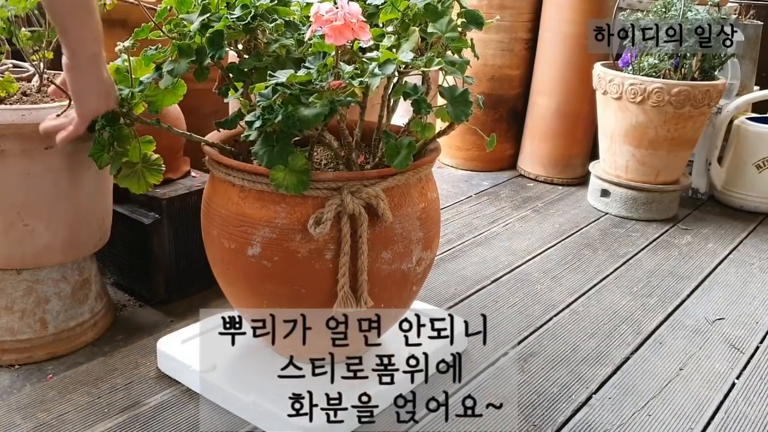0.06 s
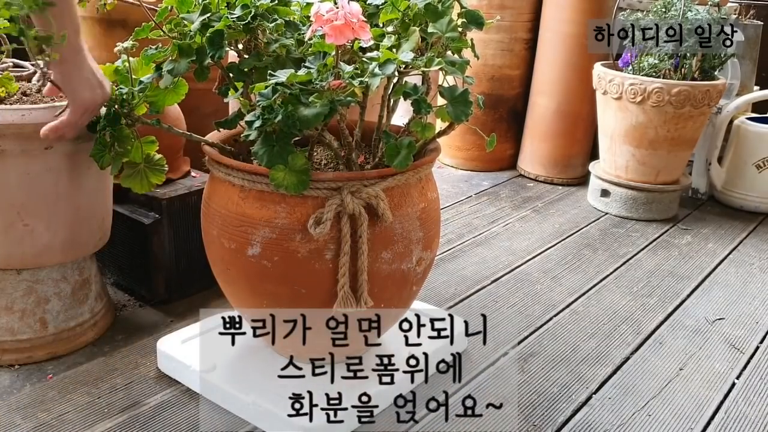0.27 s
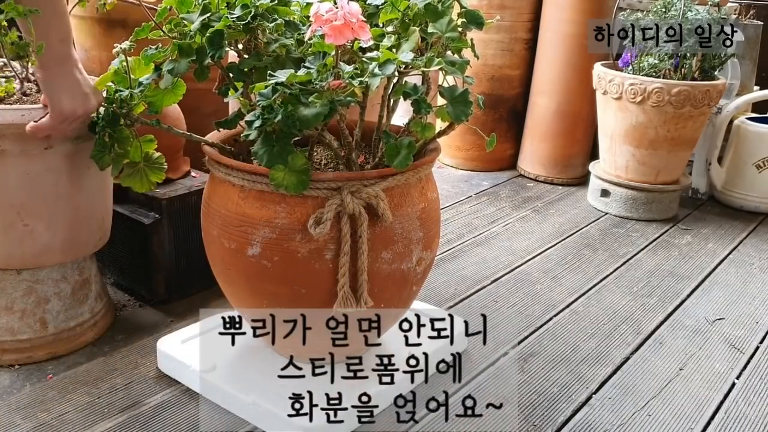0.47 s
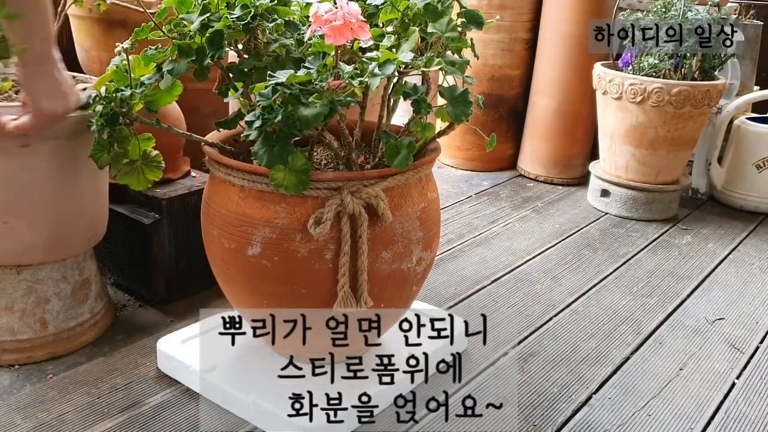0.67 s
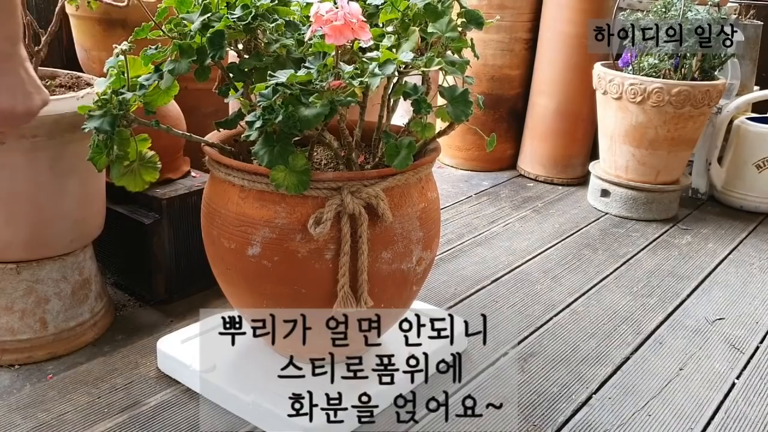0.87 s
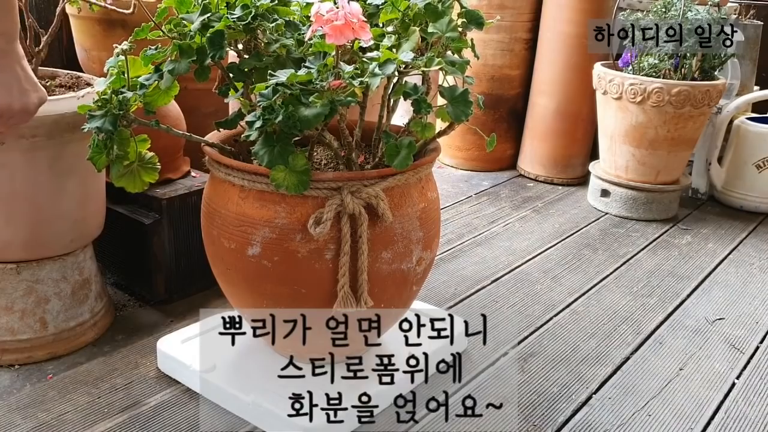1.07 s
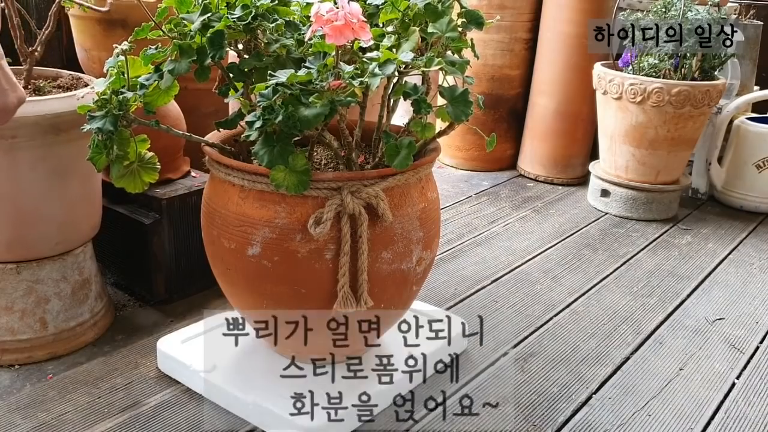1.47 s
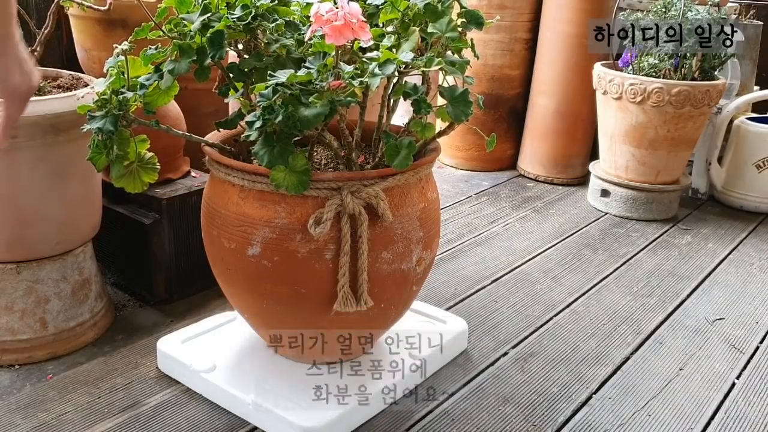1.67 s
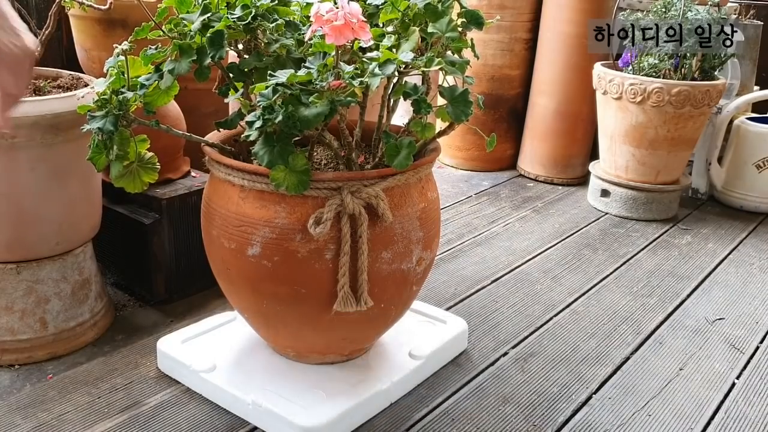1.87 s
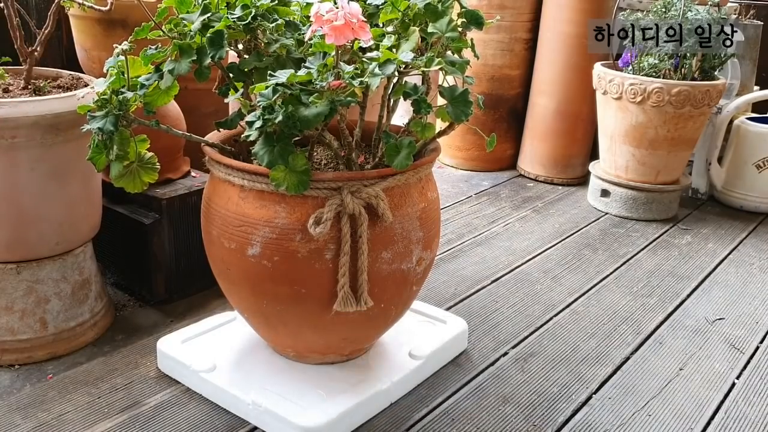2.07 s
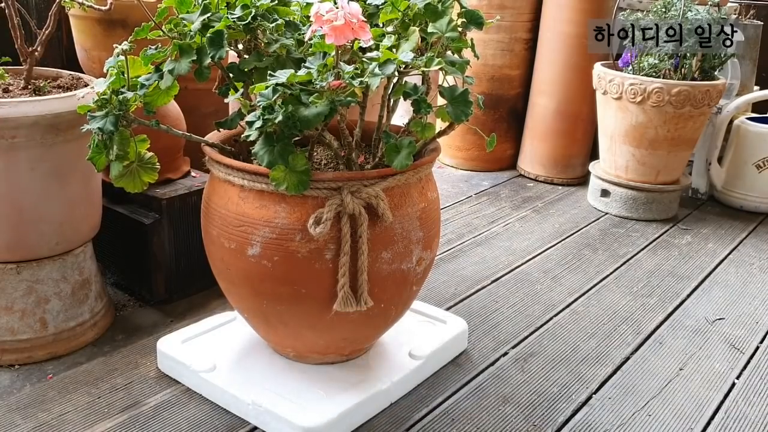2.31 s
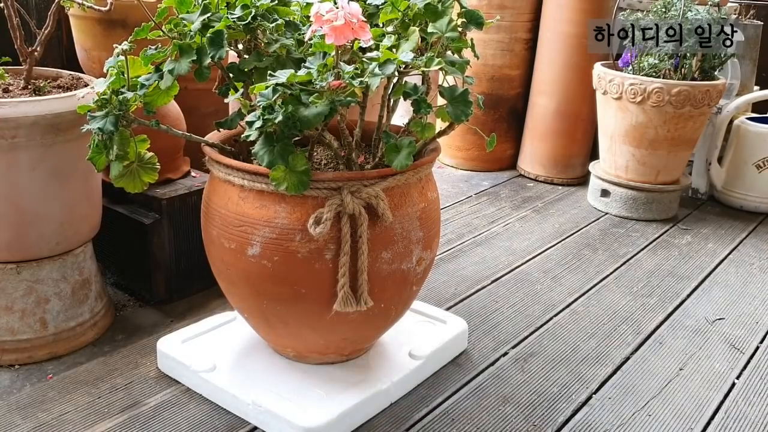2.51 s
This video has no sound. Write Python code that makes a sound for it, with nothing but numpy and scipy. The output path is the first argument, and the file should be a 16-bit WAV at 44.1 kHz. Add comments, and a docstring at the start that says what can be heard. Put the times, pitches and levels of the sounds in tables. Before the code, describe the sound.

A heavy clay pot scrapes twice across wooden boards, then rocks and settles with hollow knocks.

```python
"""A wooden deck outdoors, a stereo pair of microphones on a heavy clay pot.
The pot is pushed twice across the boards, then rocks and settles on its foot. Grit hisses under the
sliding foot and makes the clay ring, while stick and slip shakes the boards. Each knock is a hollow
thud of the deck with a gritty clack of clay. Far off lie a low rumble and one chirp of a bird."""
import sys
import numpy as np
from scipy import signal
from scipy.fft import rfft, irfft
from scipy.io import wavfile
from scipy.ndimage import uniform_filter1d

SR = 44100
rng = np.random.default_rng(int(sys.argv[2]) if len(sys.argv) > 2 else 0)


def digitize_waveform(pressure):
    """Quantize a signal to 16-bit integers and store it at the path in sys.argv[1].

    Rows of a 2-D input are taken as channels; values are limited to [-1, 1].
    """
    field = np.atleast_2d(pressure).T
    bounded = np.clip(field, -1, 1)
    quanta = np.round(bounded * 32767).astype(np.int16)
    wavfile.write(sys.argv[1], SR, quanta)


N = 116865
TIME = np.arange(N) / SR
RIGHT_LAG_S = 0.00022

# knocks of the foot: t/s, thud level/dB, clack level/dB, contact brightness/Hz
KNOCKS = [(0.430, -58, -55.5, 4500), (0.434, -43, -51, 3730), (0.45, -46, -55, 3360),
          (0.711, -48.5, -61, 6000), (0.796, -43.5, -53, 2570), (0.824, -49, -58.5, 2200),
          (0.959, -53, -60, 1760), (1.903, -39.5, -41.5, 3150), (1.9154, -47, -55, 3200),
          (1.939, -46.5, -82, 1600), (1.951, -35.5, -53, 2900), (1.968, -38.5, -61, 1720),
          (1.979, -46.5, -67, 1700), (2.001, -49, -70, 1000), (2.011, -39, -61.5, 1500),
          (2.024, -44.5, -76, 1000), (2.036, -43.5, -79, 1000), (2.1375, -50, -54.5, 4450),
          (2.142, -34, -45, 2940), (2.152, -39.5, -53, 2440), (2.183, -43.5, -68, 1780),
          (2.196, -46, -74, 1500), (2.3826, -35, -56, 910), (2.406, -40, -63, 1020),
          (2.426, -46.5, -76, 1010), (2.554, -56.5, -85, 1000)]
# modes of the pot: f/Hz, width/Hz, level struck/dB, level rubbed/dB
POT_MODES = [(965, 135, 9.5, -10), (1174, 18, 7, 1.5), (1291, 64, 17.5, -4), (1498, 43, 10.5, -8),
             (1650, 110, 9.5, -10.5), (1760, 51, 14, 3.5), (1910, 72, 9.5, -39), (2086, 21, 6, -1),
             (2450, 92, 5, -18), (2747, 29, 5, -2.5), (2750, 66, -3, -42), (3534, 40, -37, -0.5),
             (3960, 15, -29, -2), (4530, 58, -22, -4), (5610, 61, -12, -12)]
# spectrum of the grit's hiss, with the microphones' dip near 8 kHz: f/Hz, level/dB
GRIT_AT_MICS = [(300, 2), (800, 12), (1300, -6.5), (2300, 2.5), (3700, 1.5), (5800, -0.5), (6900, -9),
                (8400, -11.5), (9800, 0), (12000, 2), (15500, -6.5)]


def from_db(db):
    """Decibels to gain."""
    return 10 ** (np.asarray(db) / 20)


def rms_one(x):
    """Scale to unit power."""
    return x / np.sqrt(np.mean(x ** 2) + 1e-20)


def cut(x, hz, kind, order=2):
    """Low- or high-pass."""
    return signal.sosfilt(signal.butter(order, hz, kind, fs=SR, output="sos"), x + 1e-18)


def level(rows, column):
    """Gain over time from a dB curve, silent outside it."""
    rows = np.array(rows)
    return from_db(np.interp(TIME, rows[:, 0], rows[:, column], left=-140, right=-140))


def per_bin(points):
    """A table over log frequency, read at every FFT bin."""
    hz, value = np.transpose(points)
    return np.interp(np.log(np.arange(N // 2 + 1) * SR / N + 1), np.log(hz), value)


def colour(x, spectrum):
    """Give a steady sound its spectrum; rms 1."""
    return rms_one(irfft(rfft(x) * from_db(per_bin(spectrum)), N))


def spread(pair):
    """Two unrelated signals become scattered sound, alike at both microphones in the bass only."""
    # likeness of left and right: f/Hz, coherence
    likeness = [(60, .97), (130, 0.95), (290, 0.63), (640, 0.32), (1400, 0), (15000, 0)]
    alike = per_bin(likeness)
    a, b = rfft(pair)
    mid, side = a * np.sqrt(1 + alike), b * np.sqrt(1 - alike)
    return rms_one(irfft(np.array([mid + side, mid - side]), N))


def place(x):
    """Direct sound reaches the right microphone a little later."""
    hz = np.arange(N // 2 + 1) * SR / N
    return np.array([x, irfft(rfft(x) * np.exp(-2j * np.pi * hz * RIGHT_LAG_S), N)])


def resonate(x, hz, width):
    """A resonance with gain 1 at its peak."""
    r = np.exp(-np.pi * abs(width) / SR)
    feedback = [1, -2 * r * np.cos(2 * np.pi * hz / SR), r * r]
    return signal.lfilter(np.array([1, 0, -1]) * (1 - r * r) / 2, feedback, x + 1e-18)


def dying(start, t60):
    """Sudden onset, exponential decay."""
    age = TIME - start
    return (age >= 0) * np.exp(-np.log(1000) * np.clip(age / t60, 0, 10))


def swell(peak_s, half_s):
    """A bell-shaped rise and fall."""
    return np.exp(-((TIME - peak_s) / half_s) ** 2)


def grains(per_s, spread_db):
    """Random clicks of uneven size; rms 1."""
    sizes = from_db(spread_db * np.minimum(rng.exponential(1, N), 4)) * rng.choice([-1, 1], N)
    return rms_one(sizes * (rng.random(N) < per_s / SR))


def scrape():
    """Grit hisses and catches under the sliding foot and keeps the pot ringing."""
    # sliding speed as the level of the grit, one curve a push: t/s, level/dB
    slides = [
        [(0.53, -85), (0.542, -89), (0.554, -66.5), (0.588, -69.5), (0.71, -53.5), (0.762, -56), (0.82, -55.5),
         (0.902, -64), (0.99, -91)],
        [(1.17, -87), (1.182, -101), (1.194, -70), (1.224, -71.5), (1.374, -53.5), (1.448, -59.5), (1.52, -90)],
    ]
    speed = sum(level(slide, 1) for slide in slides)
    catches = from_db(rms_one(cut(rng.standard_normal(N), 97, "low")))
    grit = catches * spread(np.array([grains(per_s=14000, spread_db=2.5) for side in range(2)]))
    clay = rms_one(sum(from_db(db) * resonate(grit, hz, width) for hz, width, _, db in POT_MODES))
    drive = speed.max() * (speed / speed.max()) ** 0.82   # the ring varies less than the hiss
    return from_db(2.5) * speed * colour(grit, GRIT_AT_MICS) + from_db(-3) * drive * clay


def judder(modes):
    """Uneven slips of the foot drive the boards, at a level evened out over 27 ms."""
    slips = grains(per_s=420, spread_db=2.0)
    boards = sum((-1) ** k * from_db(db) * resonate(slips, hz, width)
                 for k, (hz, width, db) in enumerate(modes))
    boards = cut(boards, 815, "low", order=3)
    boards = cut(boards, modes[0][0] * 0.71, "high", order=4)
    power = np.abs(uniform_filter1d(boards ** 2, int(0.027 * SR) + 1))
    return boards / np.sqrt(power + 1e-3 * np.mean(boards ** 2))


def shaking_boards():
    """The deck groans and booms under each push."""
    # shaking of the boards, one curve a push: t/s, groan level/dB, boom level/dB
    shakes = [
        [(0.48, -62, -62), (0.536, -55, -52), (0.556, -66, -57), (0.578, -56, -64), (0.602, -61.5, -69),
         (0.632, -45.5, -55), (0.674, -49, -59), (0.706, -39.5, -51), (0.764, -44.5, -61), (0.8, -49, -51),
         (0.826, -45, -48), (0.884, -53, -63), (0.93, -68, -68), (0.968, -53.5, -58), (1.024, -69, -61.5),
         (1.05, -62, -78)],
        [(1.15, -74, -84), (1.168, -75, -60), (1.19, -59, -63), (1.212, -64.5, -62), (1.266, -51, -48.5),
         (1.302, -48.5, -58), (1.336, -41.5, -53), (1.37, -42.5, -41), (1.392, -46, -35.5),
         (1.412, -41.5, -39.5), (1.454, -47, -38), (1.52, -71, -57), (1.53, -83, -59), (1.58, -73, -67.5)],
    ]
    # middle and deep resonances of the loaded boards, one set a push: f/Hz, width/Hz, level/dB
    groans = [
        [(276.3, 28, 1), (325.6, 42.5, -1), (379, 32.5, -4), (417, 34, -3), (470, 56, -9.5), (670, 54, -22)],
        [(244, 24, -4), (309, 37, 0), (421.4, 11.3, 2.5), (441, 65, -11.5), (591, 32, -6.5), (802, 53, -19.5)],
    ]
    booms = [
        [(140, 30, -1.3), (191, 35, -0.63)],
        [(161.2, 25, 3.5), (192, 43, -9)],
    ]
    out = 0
    for shake, groan, boom in zip(shakes, groans, booms):
        out += from_db(2.5) * level(shake, 1) * judder(groan)
        out += from_db(1.5) * level(shake, 2) * cut(judder(boom), 280, "low")
    return place(out) + from_db(-12.5) * echoes(out, t60=0.18)


def grunts():
    """A few regular cycles of stick and slip as the foot breaks loose."""
    # pitched slips: t/s, half length/s, f/Hz, level/dB
    slips = [(0.624, .009, 279, -34.5), (0.710, 0.011, 275, -38)]
    return place(sum(from_db(db) * np.sin(2 * np.pi * hz * (TIME - s)) * swell(s, half_s)
                     for s, half_s, hz, db in slips))


def thuds():
    """Every knock rings the deck's modes; the shifting load changes their pitch and strength a little."""
    # modes of the deck: f/Hz, level/dB, t60/s
    deck_modes = [(79.6, -3, 0.25), (132, -13, 0.13), (161.3, 3, 0.15), (191.3, -9.5, 0.094),
                  (227, 1.5, 0.097), (293.5, 0.5, 0.1), (336, -6.5, 0.14), (407, -4.5, 0.1),
                  (484.3, -5, 0.08), (573, -11.5, 0.085), (733, -12.5, 0.1)]
    out, age = np.zeros(N + SR), np.arange(SR // 2) / SR
    for s, db, _, _ in KNOCKS:
        start = int(s * SR)
        for k, (hz, mode_db, t60) in enumerate(deck_modes):
            shift_db, detune = rng.normal(0, [1.07, 0.044])
            mode = np.sin(2 * np.pi * hz * (1 + detune) * age) * np.exp(-np.log(1000) * age / t60)
            out[start:start + len(age)] += (-1) ** (k // 2) * from_db(db + mode_db + shift_db) * mode
    out = cut(cut(out[:N], 740, "low", order=3), 92, "high")
    return place(out) + from_db(-15.5) * echoes(out, t60=0.12)


def clacks():
    """Each knock strikes the clay and crushes a little grit; softer contacts are duller."""
    grit = spread(np.array([grains(per_s=9000, spread_db=-0.5) for side in range(2)]))
    force = 0
    for s, _, db, bright_hz in KNOCKS:
        giving_way = np.clip((TIME - s) / 0.0017, 0, 1)
        contact = from_db(-3) * grit * dying(s, t60=0.067) * giving_way
        contact[[0, 1], [int(s * SR), int((s + RIGHT_LAG_S) * SR)]] += from_db(8.5)   # the strike
        force += from_db(db) * np.sqrt(SR / 2 / bright_hz) * cut(contact, bright_hz, "low")
    force = cut(cut(force, 440, "high"), 7500, "low", order=1)
    clay = force + sum(from_db(db) * resonate(force, hz, width) for hz, width, db, _ in POT_MODES)
    return clay + from_db(-7.5) * echoes(cut(clay[0], 3800, "low"), t60=0.25)


def cracking_grain(at_s=1.9035):
    """A grain cracks under the hardest clack, its crumbs scatter and the rim that hit it rings."""
    # modes of the foot's rim: f/Hz, level/dB, t60/s
    rim_modes = [(530, -38.5, 0.059), (947, -34, 0.026), (2600, -45.5, 0.019), (2790, -41.5, 0.032)]
    snap, crumbs = dying(at_s, t60=0.016), from_db(-11) * dying(at_s, t60=0.14)
    crack = rng.standard_normal((2, N)) * (snap + crumbs)
    rim = sum(from_db(db) * np.sin(2 * np.pi * hz * (TIME - at_s)) * dying(at_s, t60)
              for hz, db, t60 in rim_modes)
    return from_db(-42.5) * cut(crack, 7050, "high") + rim


def echoes(x, t60):
    """Dense short reflections from other pots, the boards and a wall nearby."""
    tail = spread(rng.standard_normal((2, N))) * dying(0.003, t60)
    return signal.fftconvolve(x[None], tail / np.sqrt(np.sum(tail ** 2) / 2), axes=1)[:, :N]


def rustles():
    """Faint high rustles while the pot is handled."""
    # swells of the rustle: t/s, half length/s, level/dB
    touches = [(0.419, .07, -69.5), (0.448, 0.017, -73), (2.336, 0.31, -75)]
    envelope = sum(from_db(db) * swell(s, half_s) for s, half_s, db in touches)
    hiss = colour(rng.standard_normal((2, N)), GRIT_AT_MICS)
    return envelope * rms_one(cut(hiss, 6200, "high"))


def bird(hz=4640, width=450):
    """One faint chirp from far off, a narrow band of noise."""
    call = rms_one(resonate(resonate(rng.standard_normal((2, N)), hz, width), hz, width))
    return from_db(-70.5) * call * swell(peak_s=0.04, half_s=0.029)


def outdoors():
    """Distant rumble and open air around the microphones."""
    # spectra of the rumble and the air, with the microphones' dip near 8 kHz: f/Hz, level/dB
    rumble_spectrum = [(12, -16), (24, 0), (29, 7.5), (32, 10), (38, 5), (44, -0.5), (51, 6), (58, 8.5),
                       (80, -7.5), (100, -28.5), (160, -50)]
    air_at_mics = [(60, -4.5), (130, 2.5), (250, -3), (420, 0), (700, -4), (1100, -9.5), (1900, -11),
                   (3000, -21.5), (5000, -28), (7000, -47.5), (8700, -82), (9800, -28.5), (15500, -28.5)]
    rumble = colour(spread(rng.standard_normal((2, N))), rumble_spectrum)
    air = colour(spread(rng.standard_normal((2, N))), air_at_mics)
    return from_db(-50) * rumble + from_db(-60.5) * air


def scene():
    """The pot on the deck in the open air, its clay a touch louder on the left."""
    clay = (scrape() + clacks() + cracking_grain()) * from_db([[0.1], [-0.1]])
    return clay + shaking_boards() + grunts() + thuds() + outdoors() + rustles() + bird()


def record(dry):
    """The top is cut steeply above 15.9 kHz."""
    return signal.sosfilt(signal.ellip(10, .1, 70, 15900, fs=SR, output="sos"), dry)


dry = scene()
out = record(dry)
digitize_waveform(out)
```